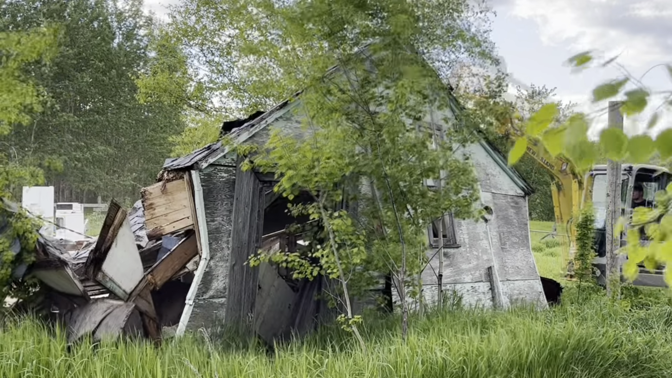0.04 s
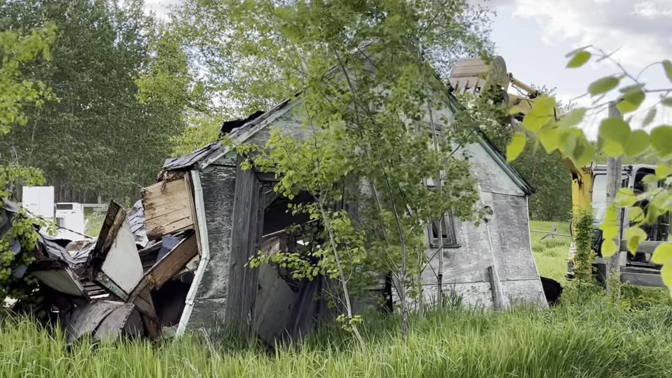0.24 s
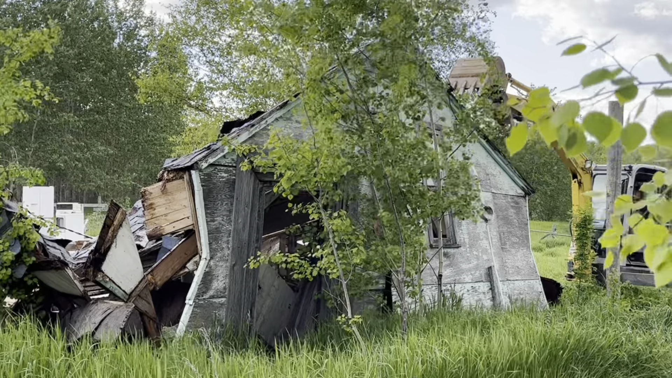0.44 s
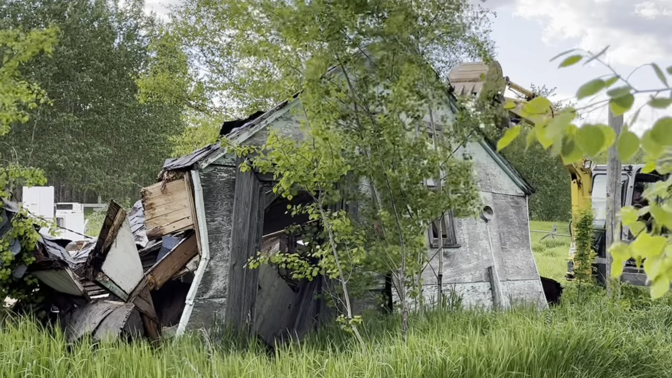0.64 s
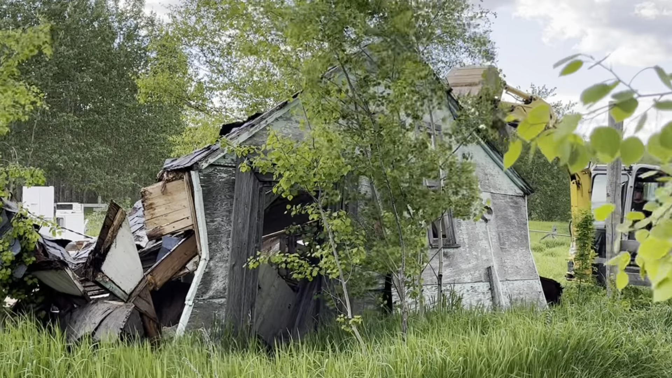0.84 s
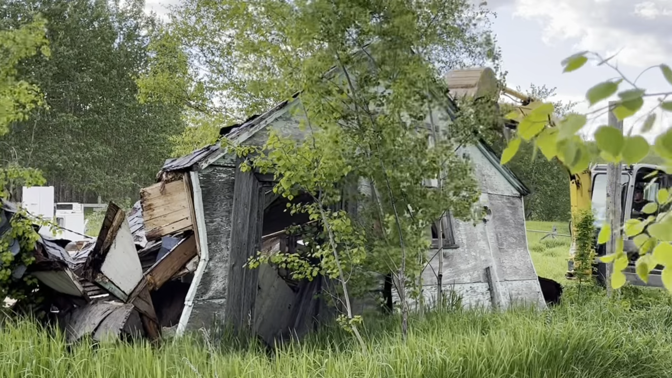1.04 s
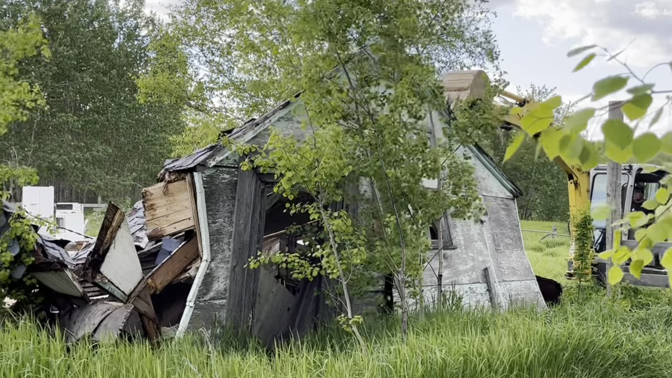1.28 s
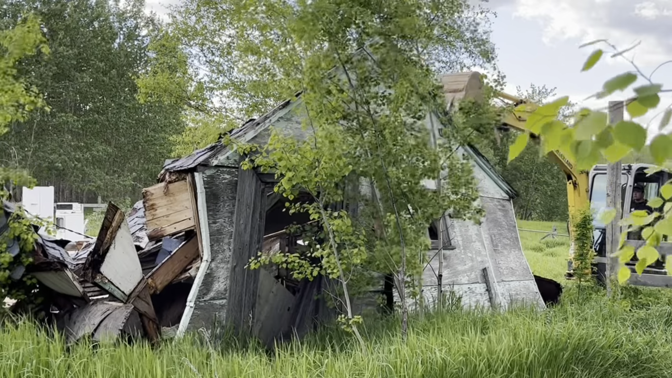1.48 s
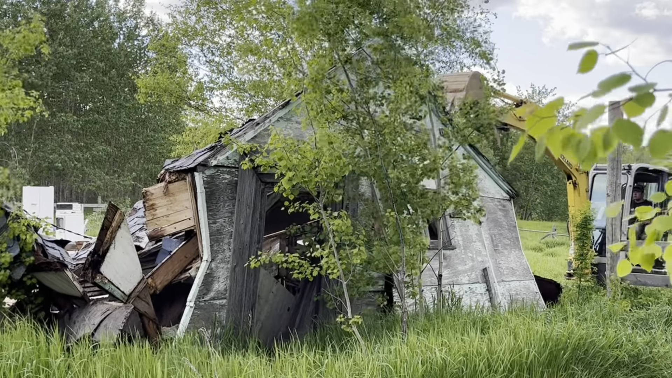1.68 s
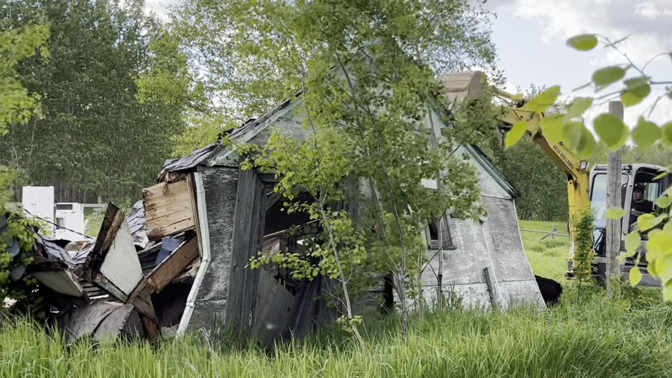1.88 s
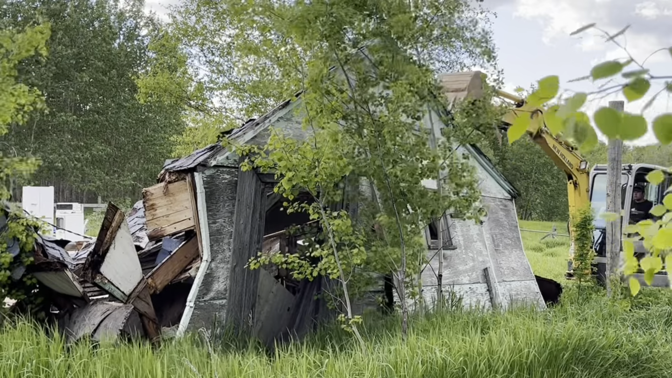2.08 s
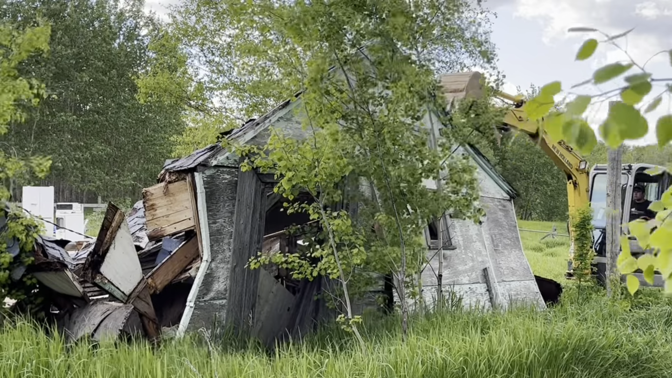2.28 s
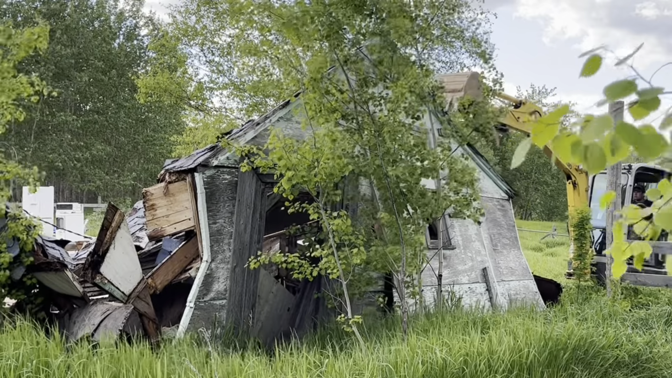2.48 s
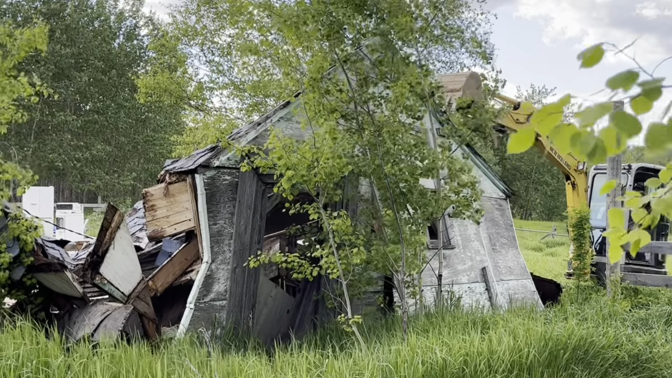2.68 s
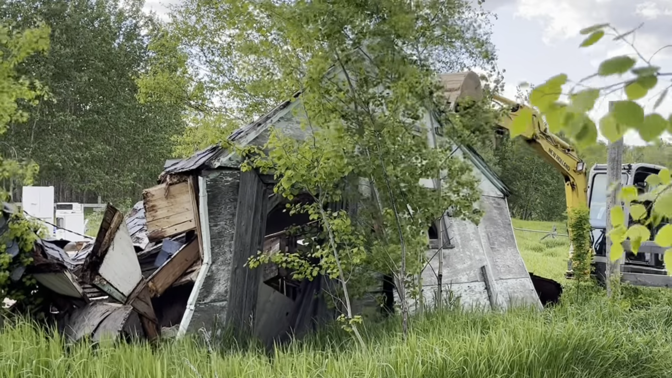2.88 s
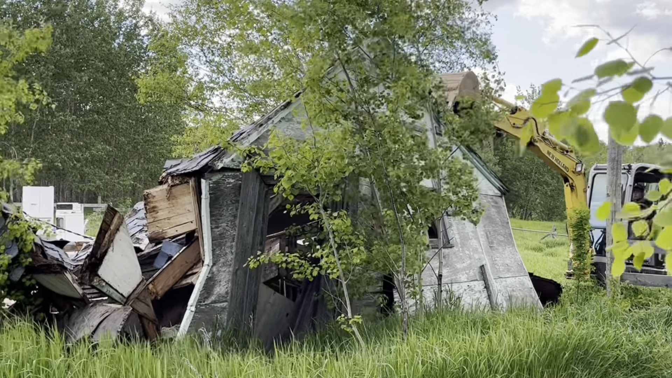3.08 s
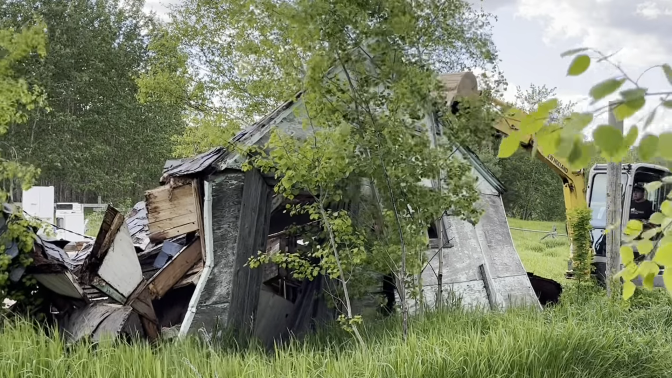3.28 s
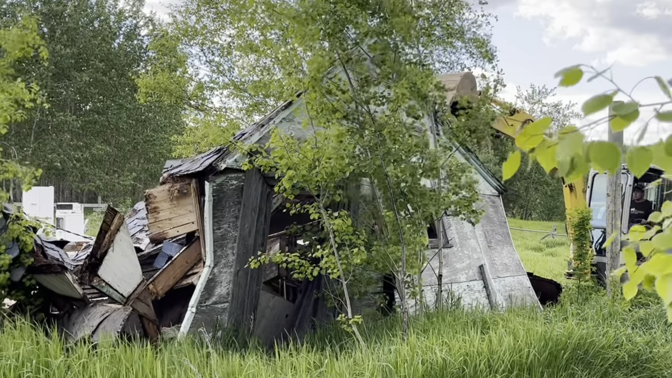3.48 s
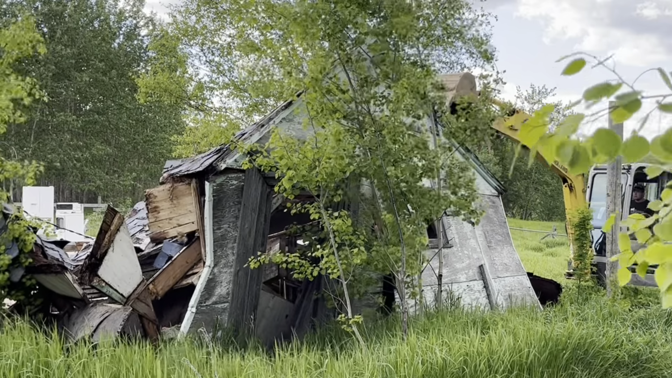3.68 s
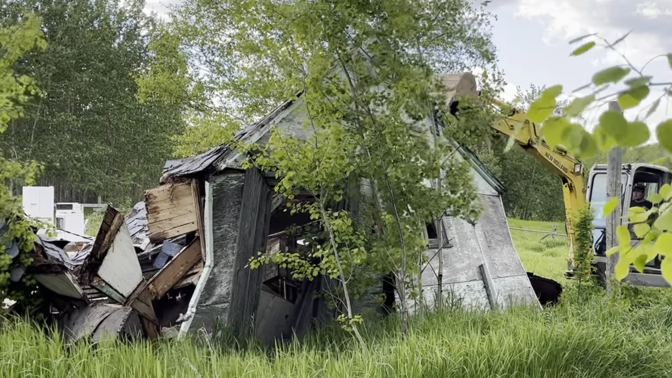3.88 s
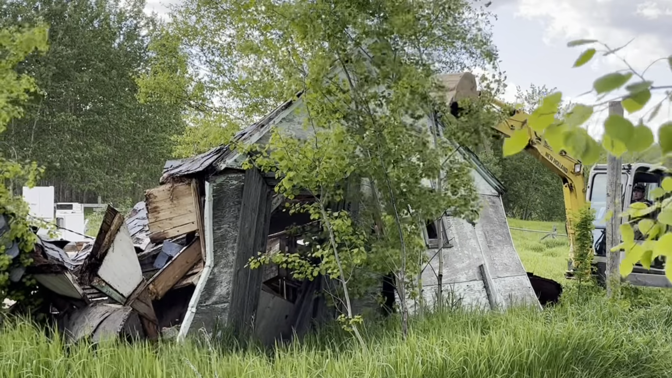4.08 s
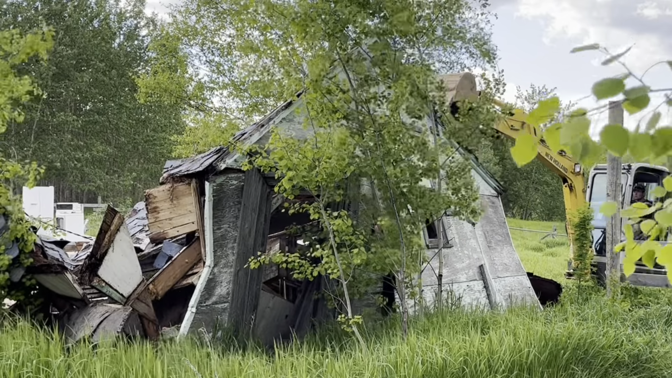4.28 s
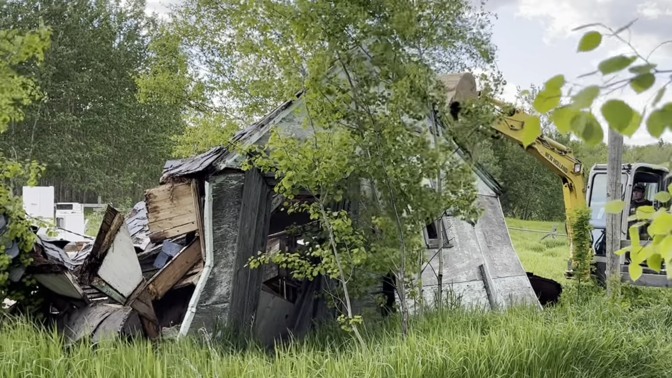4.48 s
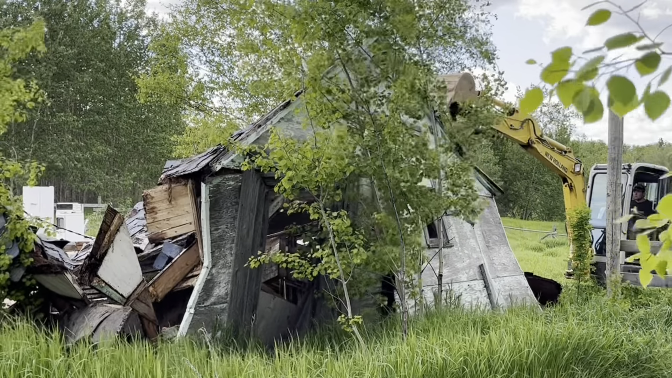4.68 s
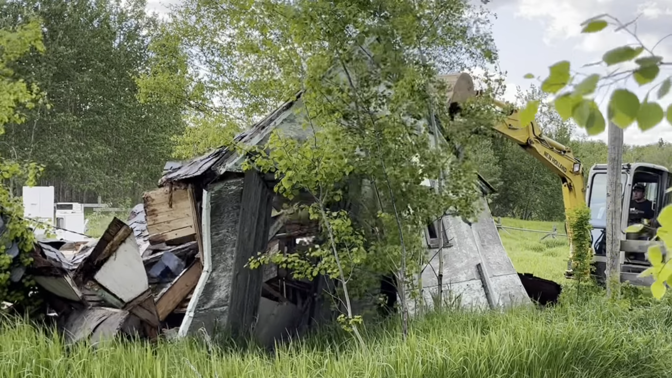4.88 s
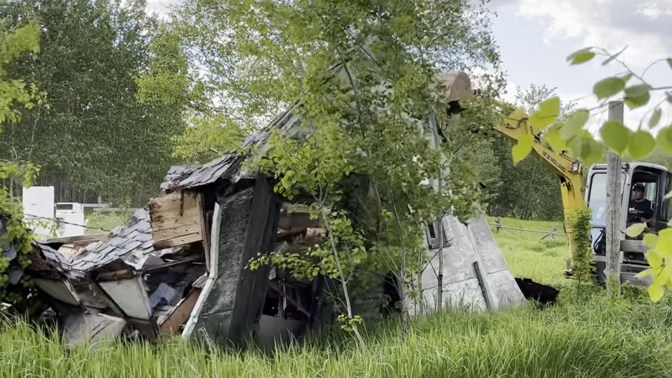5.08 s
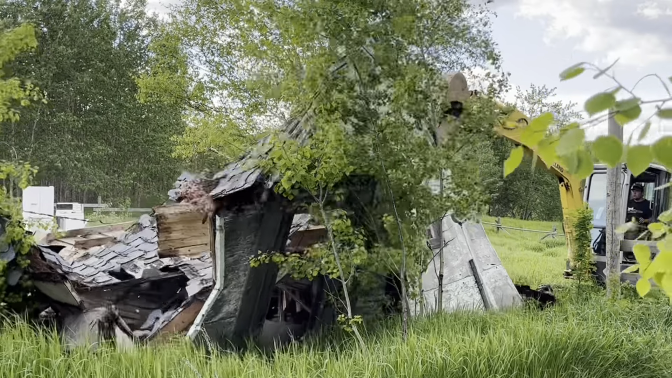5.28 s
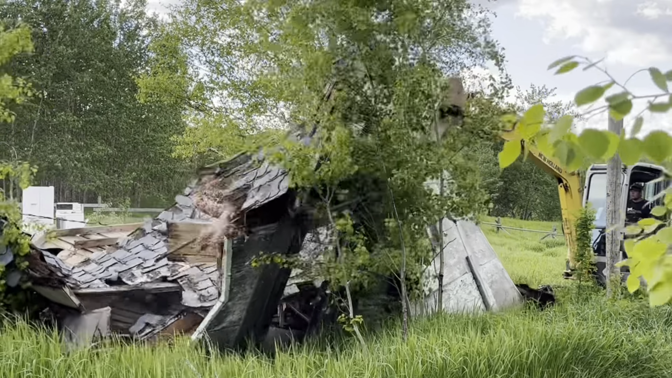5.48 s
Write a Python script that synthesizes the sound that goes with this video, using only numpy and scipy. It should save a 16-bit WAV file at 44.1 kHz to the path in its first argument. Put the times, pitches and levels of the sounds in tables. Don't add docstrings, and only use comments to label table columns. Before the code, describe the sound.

Low engine throb under bursts of snapping boards and dull timber knocks, building to a dense, crunching collapse of a wooden building.

```python
import sys
import numpy as np
from scipy import signal
from scipy.fft import rfft, irfft, next_fast_len
from scipy.io import wavfile
from scipy.ndimage import uniform_filter1d

SR = 44100
rng = np.random.default_rng(int(sys.argv[2]) if len(sys.argv) > 2 else 0)


def inscribe(sig):
    pcm = np.round(np.clip(np.atleast_2d(sig).T, -1, 1) * 32767)
    wavfile.write(sys.argv[1], SR, pcm.astype(np.int16))


def how_loud(loudness_db):
    steps = np.asarray(loudness_db, float) / 20
    return 10 ** steps


N = 244314


def evened(x):
    return x / np.sqrt(np.mean(x ** 2) + 1e-20)


def read(points, hz):
    f, value = np.transpose(points)
    return np.interp(np.log(hz + 1), np.log(f + 1), value)


def curves(rows):
    s, *columns = np.transpose(rows)
    return [np.interp(np.arange(N) / SR, s, c) for c in columns]


def shaped(x, gain):
    size = next_fast_len(len(x) + 2048)
    spectrum = rfft(x, size) * gain(np.fft.rfftfreq(size, 1 / SR))
    return irfft(spectrum, size)[:len(x)]


def band(x, lo_hz, hi_hz):
    sos = signal.butter(3, [lo_hz, min(hi_hz, SR / 2.1)], "bandpass", fs=SR, output="sos")
    return signal.sosfilt(sos, x)


def resonate(x, modes):
    total = 0
    for k, (hz, width_hz, db) in enumerate(modes):
        mode = signal.lfilter(*signal.iirpeak(hz, hz / width_hz, SR), x)
        total = total + (-1) ** k * how_loud(db) * mode
    return total


def wander(hz):
    return evened(shaped(rng.standard_normal(N), lambda f: 1 / (1 + (f / hz) ** 4)))


def add(mix, s, sound):
    part = mix[round(s * SR):][:len(sound)]
    part += sound[:len(part)]


def swells(rows, rise_s, fall_db_per_s, rest_db):
    t = np.arange(N) / SR
    power = how_loud(np.reshape(rest_db, (-1, 1))) ** 2
    for s, hold_s, *db in rows:
        rise = np.clip((t - s) / rise_s + 1, 0, 1) ** 2
        fall = how_loud(-fall_db_per_s * np.maximum(t - s - hold_s, 0))
        power = power + (how_loud(np.reshape(db, (-1, 1))) * rise * fall) ** 2
    return np.sqrt(power)


# start_s [s], firing_hz [Hz]
ENGINE_SPEED = [(0, 61.3), (.35, 61.35), (.9, 60.8), (1.05, 58.9), (1.22, 58.6), (1.45, 61.4), (1.65, 60.8),
                (1.9, 60.7), (2.2, 59.8), (2.33, 58.8), (3.3, 58.75), (3.62, 58.8), (3.75, 61.15),
                (4.02, 61.3), (4.18, 58.6), (4.3, 58.05), (4.55, 57.8), (5.54, 58)]
# order [multiple of firing rate], unloaded_db [dB], loaded_db [dB]
EXHAUST_ORDERS = [(1, -18.5, -20), (2, -29, -23), (3, -39.5, -37.5), (4, -46.5, -48), (6, -60.5, -68),
                  (7, -63, -56.5), (8, -67.5, -56), (9, -59, -68), (10, -51.5, -57.5), (11, -60, -76.5),
                  (12, -71.5, -80.5), (14, -62.5, -57.5), (16, -75.5, -63), (17, -77.5, -68.5)]
PIPE_PHASE = [(1, 0, 0), (2, 2.8, 2.35), (3, -.6, -1.8), (4, -1.3, -3.05)]
# step [multiple of firing rate], level_db [dB]
CYLINDER_SIDEBANDS = [(1 / 3, -42), (2 / 3, -36.5)]
# start_s [s], level_db [dB]
PUMP_WHINE = [(0, -123), (2.12, -81), (2.22, -41), (2.7, -39.5), (3.4, -42.5), (3.6, -47.5), (3.8, -48.5),
              (4.03, -51), (4.15, -31), (4.3, -31.5), (4.7, -32.5), (5.0, -41), (5.54, -50)]
# freq_hz [Hz], density_db [dB per Hz]
BLOCK_CLATTER = [(150, -9.5), (300, -7), (600, -15.5), (1000, -21), (1300, -29.5), (2000, -31.5),
                 (3000, -33.5), (4000, -41), (5200, -49.5), (6500, -46.5), (9000, -50), (12000, -48.5),
                 (14500, -53.5), (15500, -75.5)]
# pitch_hz [Hz], width_hz [Hz], level_db [dB]
HOOD_MODES = [(645, 99, -2.5), (816, 21, -32), (990, 8.4, 9.5), (1430, 25, -28), (2026, 140, 2.5),
              (2440, 34, -1)]


def excavator():
    free_hz, sag_hz = 61.62, 3.23
    firing_hz, = curves(ENGINE_SPEED)
    load = np.clip((free_hz - firing_hz) / sag_hz, 0, 1)
    turn = 2 * np.pi * np.cumsum(firing_hz) / SR - 1.6

    lag = {k: p + load * (q - p) for k, p, q in PIPE_PHASE}
    exhaust = 0
    for k, free_db, loaded_db in EXHAUST_ORDERS:
        level = how_loud(free_db + load * (loaded_db - free_db))
        exhaust = exhaust + level * np.cos(k * turn + lag.get(k, k * k))
    uneven = sum(how_loud(db) * 2 * np.cos(k * turn + wander(0.94)) for k, db in CYLINDER_SIDEBANDS)
    exhaust *= 1 + uneven + 0.012 * wander(5.2)

    pump_order = 20 / 3
    pump = how_loud(curves(PUMP_WHINE)[0] + 0.85 * wander(10)) * np.cos(pump_order * turn)

    bypass_hz, bypass_db = 300, -43.5
    hum_phase = 2 * np.pi * bypass_hz * np.arange(N) / SR + 0.62 * wander(6.6)
    hum = how_loud(bypass_db - 32 * load ** 3 + 1.75 * wander(11.0)) * np.cos(hum_phase)

    puffs = rng.standard_normal(N) * (1 + 0.067 * np.cos(turn + 0.36)) * how_loud(0.53 * wander(30))
    block = puffs + 1.06 * resonate(puffs, HOOD_MODES)
    block = shaped(block, lambda f: how_loud(read(BLOCK_CLATTER, f)) * (f / (f + 60.)) ** 3)
    return np.sqrt(2) * (exhaust + pump + hum) + how_loud(-45.5) * evened(block)


# freq_hz [Hz], density_db [dB per Hz]
WOOD_SPECTRUM = [(150, 14), (300, -8.5), (600, -6.5), (1000, -9), (1300, -13.5), (2000, -15.5),
                 (3000, -18.5), (4000, -21.5), (5200, -28), (6500, -24.5), (9000, -24.5), (12000, -33),
                 (14500, -36), (15500, -48)]
# pitch_hz [Hz], width_hz [Hz], level_db [dB]
BOARD_MODES = [(171.3, 36, -5), (262.4, 48.3, -2), (311, 55, 0.5), (353.2, 20.3, 4), (376, 48, 0),
               (491, 59, -1.5), (552, 37, -4)]
# pitch_hz [Hz], width_hz [Hz], level_db [dB]
CHIP_MODES = [(750, 86, -9.5), (1183, 100, -2), (1450, 62, 2.5), (1950, 110, -4), (2500, 130, 2.5),
              (3200, 170, -4.5), (4100, 220, -13)]
# start_s [s], hold_s [s], patter_db [dB], treble_db [dB], groan_db [dB]
BUCKET_PUSHES = [(0, 0.057, -56, -54, -65), (0.78, 0.033, -36.5, -54.5, -26.5),
                 (0.947, 0.17, -44, -57, -28.5), (1.173, 0.18, -44, -56, -32),
                 (1.515, 0.027, -38, -42.5, -58), (1.782, .11, -53, -59, -63),
                 (2.237, 0.019, -46, -53, -60), (2.372, 0.24, -51.5, -62.5, -58),
                 (2.617, 0.097, -43, -52.5, -33), (2.788, 0.11, -36, -43.5, -17),
                 (2.961, 0.17, -42, -49.5, -30.5), (3.185, 0.21, -40, -43.5, -24.5),
                 (3.453, 0.18, -52.5, -60.5, -68), (3.684, 0.15, -52, -56, -50),
                 (3.882, 0.17, -57.5, -63.5, -68), (4.114, 0.14, -43.5, -59, -34),
                 (4.314, 0.055, -33, -51, -21), (4.387, 0.06, -43.5, -53.5, -33),
                 (4.531, 0.27, -36.5, -43, -43), (4.743, 0.12, -28.5, -40, -22),
                 (4.92, 0.049, -26, -30, -22.5), (5.006, 0.22, -29.5, -36, -22),
                 (5.223, .35, -22, -31, -17)]


def debris():
    clumps = how_loud(2.5 * wander(40))
    struck = rng.random(N) < 800 / SR * clumps
    size = how_loud(3.7 * np.minimum(rng.exponential(1, N), 3.5)) * struck
    decay = how_loud(-60 * np.arange(900) / SR / 0.021)
    grit = signal.oaconvolve(size, decay)[:N] * rng.standard_normal(N)
    grit = evened(grit) + 0.57 * rng.standard_normal(N)
    grit = shaped(grit, lambda f: how_loud(read(WOOD_SPECTRUM, f)))

    piece = np.cumsum(size > 0) % len(CHIP_MODES)
    chips = sum(resonate(size * (piece == k), [mode]) for k, mode in enumerate(CHIP_MODES))
    patter = evened(band(grit, 496, 5400)) + 0.35 * evened(chips)
    dust = band(grit + np.roll(grit, SR // 3), 6000, 22000)
    groan = resonate(band(grit, 189.0, 544), BOARD_MODES)

    gains = swells(BUCKET_PUSHES, rise_s=0.053, fall_db_per_s=187, rest_db=[-76, -71, -66])
    layers = zip((patter, dust, groan), gains, (-2.4, -1.8, -5.5))
    return sum(gain * how_loud(trim_db) * evened(x) for x, gain, trim_db in layers)


# freq_hz [Hz], density_db [dB per Hz]
THUD_SPECTRUM = [(25, -27), (40, 5), (70, 13.5), (110, 7), (150, 5), (200, -4), (320, -34), (700, -89)]
# start_s [s], hold_s [s], level_db [dB]
TIMBER_FALLS = [(0, 0.0089, -50), (.68, 0.057, -41.5), (1.05, 0.12, -32), (1.97, 0.035, -31),
                (2.77, 0.61, -28), (3.22, 0.017, -33.5), (3.99, 0.033, -30), (4.18, 0.96, -29.5),
                (4.75, 0.022, -16.5), (4.95, 0.026, -21), (5.13, 0.31, -18), (5.29, 0.052, -16)]


def rumble():
    lumps = rng.standard_normal(N) * how_loud(2.5 * wander(14))
    thuds = evened(shaped(lumps, lambda f: how_loud(read(THUD_SPECTRUM, f))))
    return swells(TIMBER_FALLS, rise_s=0.03, fall_db_per_s=113, rest_db=-39)[0] * thuds


# start_s [s], peak_db [dB], center_hz [Hz]
FIBRE_TICKS = [(.019, -48.5, 7000), (.966, -47, 2400), (.998, -32, 6000), (1.055, -35, 6040),
               (1.105, -33, 5500), (1.292, -30, 10900), (1.297, -29.5, 11450), (1.288, -21.5, 6700),
               (1.3, -26.5, 6400), (1.347, -28.5, 6040), (1.471, -30, 4200), (1.68, -40, 11100),
               (1.902, -36, 7000), (2.196, -45, 10860), (2.413, -42, 12500), (2.528, -47, 11100),
               (2.556, -43, 13600), (2.59, -49.5, 11100), (2.612, -39, 10000), (2.75, -35, 10000),
               (2.875, -33, 4200), (2.962, -24, 4100), (3.002, -27, 12550), (3.017, -43.5, 10960),
               (3.097, -19, 10900), (3.124, -29.5, 11500), (3.141, -28, 10900), (3.179, -29, 10060),
               (3.335, -34, 7000), (3.352, -7.5, 11300), (3.371, -21, 11150), (3.403, -20, 6540),
               (3.412, -28, 9400), (3.451, -42, 6500), (3.472, -39, 12200), (3.753, -46, 10950),
               (3.794, -29.5, 10050), (3.853, -40.5, 11000), (4.106, -26, 11400), (4.168, -33, 11100),
               (4.386, -33.5, 11000), (4.439, -41.5, 11050), (4.6, -23.5, 3480), (4.628, -20.5, 4400),
               (4.688, -19, 5500), (4.705, -19, 1300), (4.716, -16, 2500), (4.75, -20, 5040),
               (4.92, -13.5, 3410), (5.008, -15.5, 2330), (5.027, -32, 2500), (5.056, -14, 3000),
               (5.174, -10.5, 2500), (5.201, -4, 3480), (5.378, -6, 4570), (5.39, -17, 2980)]


def ticks():
    out, t = np.zeros(N), np.arange(SR // 5) / SR
    for s, db, hz in FIBRE_TICKS:
        burst = rng.standard_normal(len(t)) * how_loud(-60 * t / 0.006)
        tick = band(burst, 0.5 * hz, 1.45 * hz)
        add(out, s, how_loud(db) * tick / abs(tick).max())
    return out


def crack(db, hz, knock_db, treble_db, t60, broad, rise_s):
    t = np.arange(SR // 4) / SR
    noise, ragged = rng.standard_normal((2, len(t)))
    fade = how_loud(-60 * t / np.clip(t60, .02, .6)) * (1 - np.exp(-t / max(rise_s, 1e-4)))
    tick = 1 + 0.1 * np.exp(-t / 0.0045)
    snaps = noise * how_loud(4.17 * evened(uniform_filter1d(ragged, size=60))) * fade * tick
    wood = shaped(snaps, lambda f: how_loud(read(WOOD_SPECTRUM, f)))

    wide = evened(band(wood * fade ** .4, 700, 3800))
    near = evened(band(wood, 0.5 * hz, 1.91 * hz))
    ring = evened(resonate(snaps, [(hz, 0.071 * hz, 0)]))
    body = broad * wide + 1.2 * near + .75 * ring

    piece = [(f * rng.uniform(.92, 1.08), w, g + rng.normal(0, 2.5)) for f, w, g in BOARD_MODES]
    thud = evened(band(snaps * fade, 212, 870))
    knock = evened(resonate(snaps * fade, piece)) + 0.51 * thud
    treble = band(wood, 3850, 22600)
    parts = zip((body, knock, treble), (db + 4.5, knock_db - 3.0, treble_db + 3.5))
    return sum(how_loud(level_db) * x / abs(x).max() for x, level_db in parts)


# start_s [s], crack_db [dB], ring_hz [Hz], t60_s [s]
SHINGLE_SNAPS = [(0.162, -51, 6030, 0.13), (1.201, -32.5, 2800, 0.037), (1.289, -35.5, 6200, 0.033),
                 (1.301, -42, 6640, 0.11), (1.471, -35.5, 3680, 0.044), (1.681, -57, 5530, 0.1),
                 (1.9, -46, 3520, 0.07), (2.373, -31, 2300, 0.032), (2.409, -53, 5000, 0.046),
                 (2.499, -44.5, 2440, 0.073), (2.544, -40, 2090, 0.06), (2.699, -30, 2720, 0.058),
                 (2.876, -17, 4460, 0.016), (2.963, -20.5, 4540, 0.024), (3.097, -38, 6800, 0.079),
                 (3.125, -30.5, 2020, 0.25), (3.347, -36, 7940, 0.03), (3.402, -33, 6700, 0.057),
                 (3.45, -50, 5970, 0.026), (3.768, -33.5, 2460, 0.025), (3.794, -36.5, 2620, .04),
                 (4.106, -64, 6550, 0.018), (4.362, -32, 2530, 0.021), (4.654, -28, 2860, .07),
                 (4.762, -26.5, 3600, 0.053), (4.852, -20, 2560, 0.055), (5.199, -17, 3940, 0.015),
                 (5.38, -17, 4140, 0.025), (5.419, -24, 3350, 0.2), (5.534, -14, 2320, 0.1)]


def shingles():
    out = np.zeros(N)
    for s, db, hz, t60 in SHINGLE_SNAPS:
        add(out, s, crack(db, hz, db - 3.5, db + 1, t60, broad=.2, rise_s=0.00028))
    return out


def break_boards(rows, treble_db):
    out = np.zeros(N)
    for s, db, hz, knock_db, t60 in rows:
        add(out, s, crack(db, hz, knock_db, db + treble_db, t60, broad=1.0, rise_s=0.0013))
    return out


# start_s [s], crack_db [dB], ring_hz [Hz], knock_db [dB], t60_s [s]
GRAIN_SPLITS = [(.734, -40.5, 1950, -51, 0.097), (2.212, -26, 2200, -22.5, 0.12),
                (2.624, -26, 2120, -15.5, 0.12), (2.667, -32.5, 2120, -23.5, 0.04),
                (3.064, -26.5, 2500, -17, 0.017), (3.178, -31, 5000, -32, 0.11),
                (3.237, -14, 3850, -20, 0.16), (3.368, -14, 1000, -4, 0.026),
                (4.542, -14.5, 1340, -10.5, 0.029), (4.688, -24.5, 2780, -8.5, 0.24),
                (4.703, -26.5, 1010, -17.5, 0.06), (4.749, -33.5, 1600, -11.5, 0.06),
                (4.92, -10.5, 2350, -8.5, 0.029), (4.973, -22.5, 1820, -11, 0.21),
                (5.005, -11.5, 2580, -19, 0.018), (5.025, -18, 2470, -22, 0.073),
                (5.101, -18.5, 2240, -12.5, 0.26), (5.318, -26.5, 1260, -25, 0.29)]


def splits():
    return break_boards(GRAIN_SPLITS, treble_db=-1.5)


# start_s [s], crack_db [dB], ring_hz [Hz], knock_db [dB], t60_s [s]
BEAM_BREAKS = [(.778, -19, 2230, -15.5, 0.1), (.92, -55, 970, -24, 0.41), (.933, -30, 1410, -23, 0.67),
               (.965, -22, 1960, -14.5, 0.16), (.998, -29.5, 1400, -22.5, 0.36),
               (2.612, -35, 990, -19.5, 0.053), (2.801, -15, 1380, -19.5, 0.057),
               (2.905, -9, 842, -12, 0.017), (2.989, -24.5, 1510, -21.5, 0.038),
               (3.034, -11.5, 974, -5, 0.037), (3.191, -12, 737, -8.5, 0.027),
               (3.222, -23.5, 1710, -13.5, 0.045), (4.145, -32.5, 750, -15, 0.14),
               (4.244, -35, 820, -16.5, 0.083), (4.311, -23, 940, -26, 0.12),
               (4.489, -37, 1500, -18, 0.099), (4.526, -13.5, 939, -11, 0.17),
               (4.668, -18.5, 1020, -9, 0.035), (4.789, -13, 1184, -10, 0.016),
               (5.054, -25, 3030, -23, 0.036), (5.44, -36, 1520, -11.5, 0.041)]


def beams():
    return break_boards(BEAM_BREAKS, treble_db=-52)


# start_s [s], peak_db [dB], pitch_hz [Hz], t60_s [s]
TIMBER_KNOCKS = [(.781, -19, 363, 0.17), (1.106, -14.5, 308, 0.047), (1.395, -20.5, 430, 0.038),
                 (2.756, -10.5, 470, 0.05), (2.787, -9, 748, 0.042), (2.798, -7.5, 480, 0.068),
                 (2.851, -4.5, 305, 0.048), (2.906, -6.5, 802, 0.037), (2.908, -7.5, 310, 0.056),
                 (2.937, -10.5, 320, 0.042), (2.99, -19, 614, .06), (3.036, -8, 311, 0.07),
                 (3.193, -10, 313, 0.054), (3.245, -19.5, 990, 0.053), (3.253, -22, 3480, .04),
                 (3.273, -25, 4130, 0.038), (3.323, -40, 4100, 0.054), (3.347, -12.5, 309, 0.072),
                 (3.349, -9, 830, 0.034), (3.369, -23, 603, 0.085), (4.528, -10, 324, 0.051),
                 (4.67, -12, 327, .07), (4.704, -17.5, 339, 0.14), (4.788, -8.5, 555, 0.057),
                 (4.79, -4, 1240, 0.024), (4.815, -11.5, 491, 0.069), (4.923, -7.5, 540, 0.055),
                 (4.954, -9, 195, 0.065), (5.111, -24.5, 557, 0.23), (5.335, -11, 1770, 0.028),
                 (5.29, -10.5, 560, 0.059), (5.421, -14.5, 3200, .06), (5.43, -19, 2790, 0.035),
                 (5.51, -17, 403, 0.083), (3.772, -33, 530, .06), (4.885, -17, 150, 0.084),
                 (5.135, -11, 128, 0.12), (5.394, -12, 184.7, 0.18), (5.435, -16.5, 268, 0.084),
                 (5.2, -15, 927, .05), (5.4, -18, 708, 0.054), (5.101, -22, 350, .1)]


def knocks():
    out, t = np.zeros(N), np.arange(SR // 5) / SR
    for s, db, hz, t60 in TIMBER_KNOCKS:
        pair = np.sin(2 * np.pi * hz * t) + 0.42 * np.sin(2 * np.pi * 1.17 * hz * t)
        onset = 1 - np.exp(-t / 0.0014)
        add(out, s, how_loud(db - 60 * t / max(t60, .02)) * onset * pair)
    return out


# start_s [s], peak_db [dB], center_hz [Hz]
SPLINTER_BURSTS = [(0.781, -30.5, 5800), (.795, -37, 5800), (.815, -43, 5800), (1.035, -36, 5500),
                   (1.05, -36, 6000), (1.297, -25.5, 11000), (1.304, -27, 10500), (3.25, -25, 11200),
                   (4.628, -26, 11000), (5.027, -18, 12000), (5.381, -18.5, 11000), (5.102, -24.5, 5000),
                   (0.969, -39, 2500), (2.214, -30, 3700), (2.775, -23, 2220), (2.787, -21, 2360),
                   (2.802, -30, 2580), (2.851, -19.5, 1900), (2.937, -22, 2500), (2.963, -17, 4100),
                   (2.876, -12, 3900), (4.704, -20, 1590), (1.347, -23.5, 2160), (3.034, -28, 3200),
                   (4.765, -16.5, 3520), (4.855, -18.5, 2900), (4.874, -16.5, 3200), (4.95, -23, 4200),
                   (4.976, -17, 6000), (5.11, -18, 1910), (5.125, -15, 2600), (5.198, -16.5, 3800),
                   (5.242, -11, 2420), (5.246, -15, 3870), (5.294, -24, 2600), (5.357, -12, 2600),
                   (5.38, -8, 4170), (5.423, -17, 3200), (5.478, -17, 1800)]


def splinters():
    out, t = np.zeros(N), np.arange(SR // 20) / SR
    for s, db, hz in SPLINTER_BURSTS:
        spray = rng.standard_normal(len(t)) * how_loud(-60 * t / .018)
        snap = band((t == 0) + 0.24 * spray, 0.58 * hz, 1.38 * hz)
        add(out, s, how_loud(db) * snap / abs(snap).max())
    return out


# start_s [s], crack_db [dB], ring_hz [Hz], knock_db [dB], t60_s [s]
PLANK_BREAKS = [(1.103, -34.5, 1090, -23, 0.13), (1.347, -24.5, 1410, -42, .023),
                (1.392, -23, 1190, -17.5, 0.14), (1.499, -28, 2000, -24, .1),
                (1.427, -31, 1360, -30, 0.043), (1.535, -25, 2700, -23.5, .096),
                (2.751, -24, 1470, -16, 0.044), (2.773, -52, 744, -7, 0.02), (2.788, -24, 725, -8.5, 0.36),
                (2.846, -17, 1140, -5, 0.048), (2.937, -32.5, 710, -29, 0.078), (3.244, -15, 4100, -8, .05),
                (3.345, -14, 1940, -4.5, 0.062), (3.677, -22.5, 2210, -21.5, .11),
                (4.168, -43, 674, -40, 0.041), (4.573, -22, 930, -15.5, 0.094), (4.6, -31, 605, -35, .043),
                (4.627, -23, 4450, -45, 0.017), (4.874, -18, 820, -20, 0.046),
                (5.173, -18.5, 3640, -17, 0.18), (5.198, -20.5, 2090, -9, 0.053),
                (5.245, -14, 3800, -29, 0.054), (5.292, -30.5, 1070, -15.5, 0.068),
                (5.357, -17.5, 2280, -38, 0.07), (5.486, -14, 844, -6.5, 0.024)]


def planks():
    return break_boards(PLANK_BREAKS, treble_db=-7)


def meadow(x):
    taps = rng.choice([-1., 1.], SR // 3) * (rng.random(SR // 3) < .05)
    taps *= how_loud(-60 * np.arange(SR // 3) / SR / 0.25)
    return signal.oaconvolve(x, band(taps / np.linalg.norm(taps), 160, 5500))[:N]


# freq_hz [Hz], level_db [dB]
LEAF_SCATTER = [(60, -29), (200, -20), (500, -11), (1500, -8), (2300, -14), (5200, -6), (7300, -9),
                (8000, -22), (8700, -24), (9400, -8), (10700, -9), (11900, -28), (13600, -4), (15000, -24)]


def scattered(x):
    hz, _, z = signal.stft(x, SR, nperseg=256)
    a, b = uniform_filter1d(rng.standard_normal((2,) + z.shape), size=4, axis=1)
    drift = np.exp(1j * np.angle(a + 1j * b))
    level = how_loud(read(LEAF_SCATTER, hz))[:, None]
    return signal.istft(z * level * drift, SR, nperseg=256)[1][:N]


def scene():
    barn = debris() + shingles() + splits() + beams() + planks()
    snaps = ticks() + knocks() + splinters()
    direct = excavator() + rumble() + barn + how_loud(-12.5) * meadow(barn) + snaps
    apart = scattered(direct) + how_loud(-10) * band(snaps, 7000, 9800)
    return np.array([direct + apart, direct - apart]) * how_loud([[.15], [-.15]])


def low_pass(x):
    return signal.sosfilt(signal.butter(12, 15700, fs=SR, output="sos"), x)


# freq_hz [Hz], left_lead_rad [rad]
PORT_LEAD = [(0, 0), (1120, .1), (1640, -.3), (1900, 0), (3270, .9), (4910, .1), (5600, -1.2), (6460, -1.2),
             (8010, -2.9), (8250, -3.1), (8650, -3.2), (8900, -3.4), (11200, -6.15), (12700, -6.4),
             (14500, -9.2), (15600, -9.5)]


def record(dry):
    hz, lead = np.transpose(PORT_LEAD)
    left = shaped(dry[0], lambda f: np.exp(.5j * np.interp(f, hz, lead)))
    right = shaped(dry[1], lambda f: np.exp(-.5j * np.interp(f, hz, lead)))
    mix = 1.252 * np.tanh(np.array([left, right]) / 1.337)
    return low_pass(mix)


dry = scene()
out = record(dry)
inscribe(out)
```